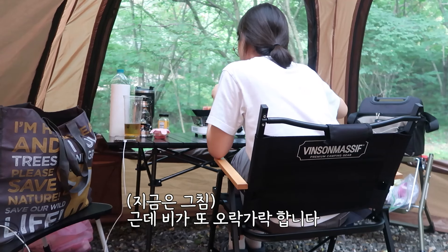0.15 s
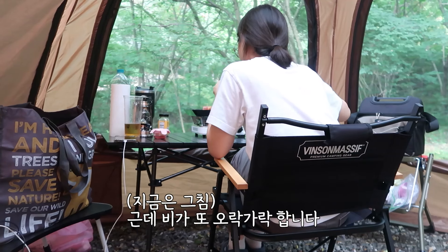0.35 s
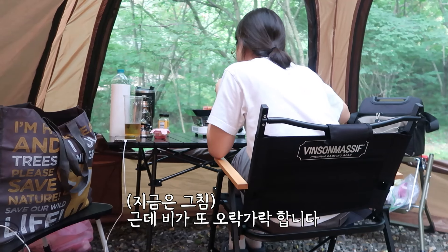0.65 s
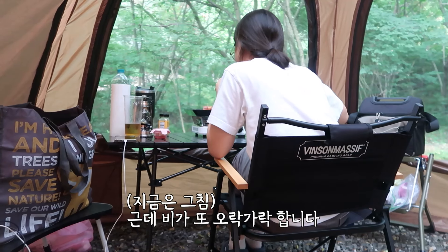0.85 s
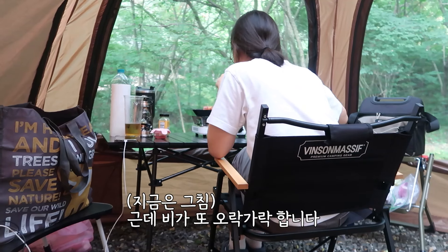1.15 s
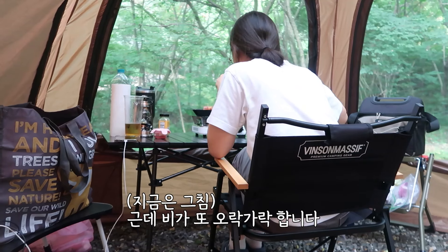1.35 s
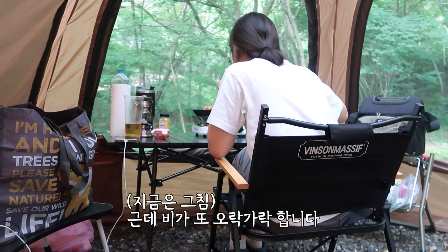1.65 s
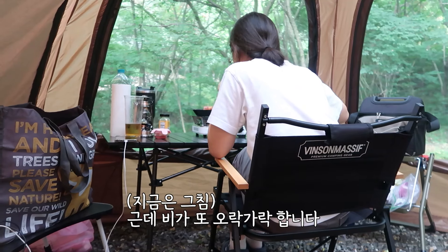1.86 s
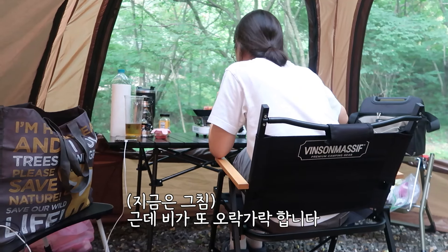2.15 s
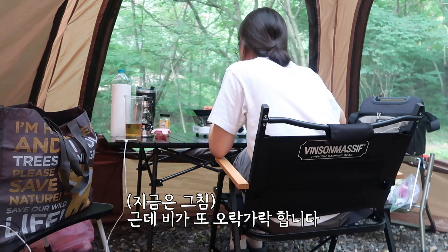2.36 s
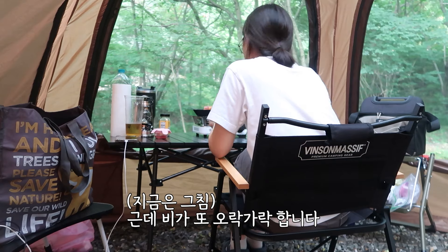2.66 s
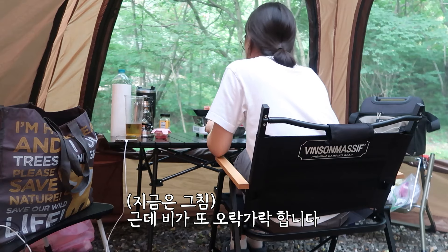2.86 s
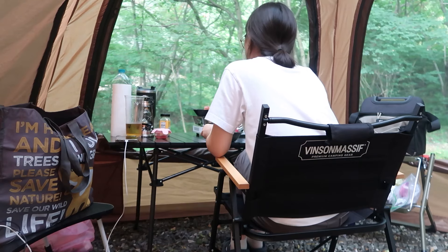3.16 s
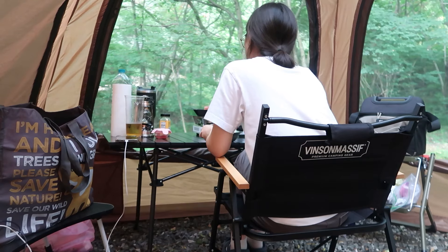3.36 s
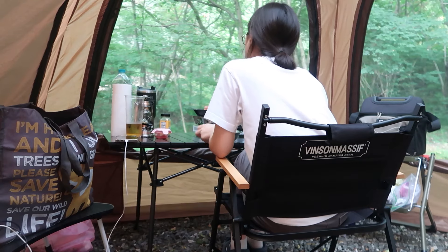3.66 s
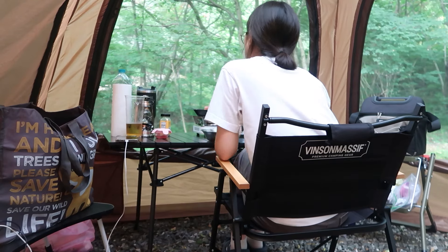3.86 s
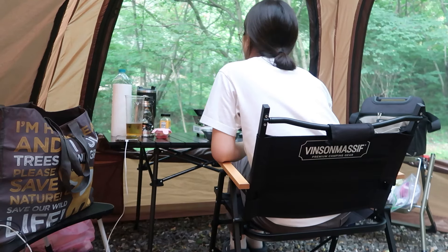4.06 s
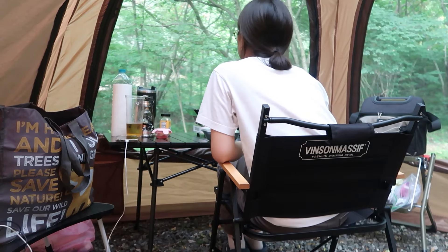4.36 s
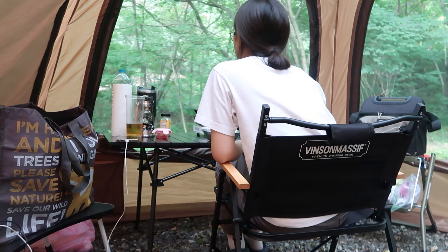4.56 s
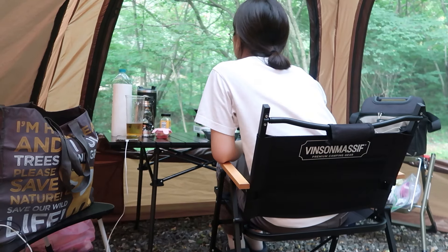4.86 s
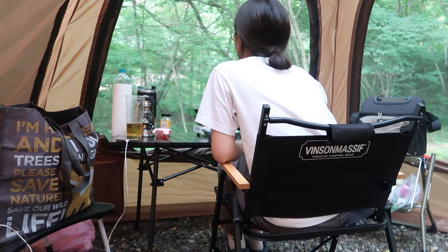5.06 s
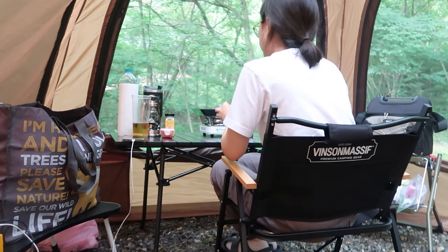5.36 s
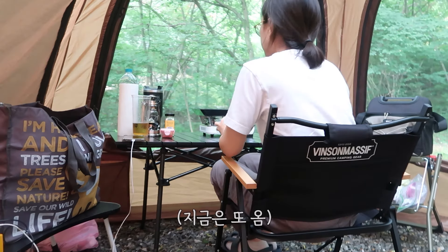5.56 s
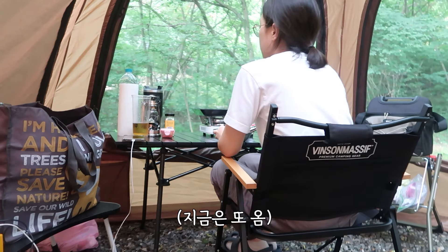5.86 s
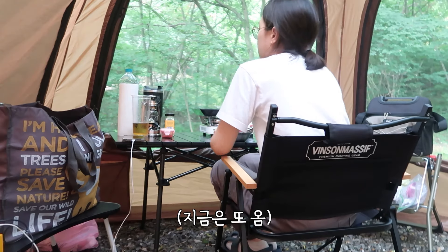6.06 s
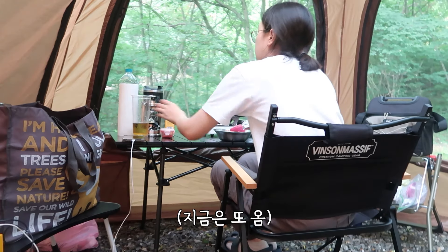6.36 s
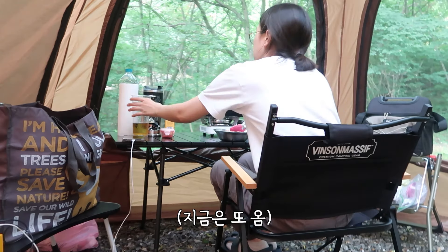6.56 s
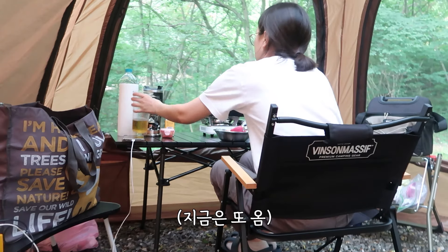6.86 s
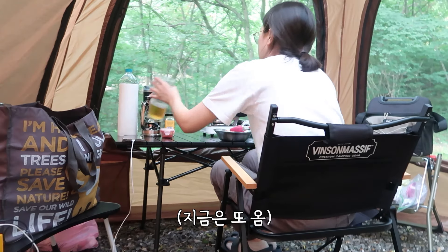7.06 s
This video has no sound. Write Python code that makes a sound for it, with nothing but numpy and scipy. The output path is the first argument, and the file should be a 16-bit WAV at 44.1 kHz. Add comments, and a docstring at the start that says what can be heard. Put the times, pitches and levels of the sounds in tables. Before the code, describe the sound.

Inside a tent in a forest, close stereo pickup. A faint airy wash with sparse drips and thin birdsong; a utensil lightly scrapes and ticks a pan, later a sharp pan strike and two table knocks. Just past five seconds it cuts hard to louder rain pattering on taut fabric with fat drops, a cup clack, a stronger dish clack, and a slurred bird whistle.

```python
"""Rain on the taut fabric of a tent, heard from inside: filtered noise forms its wash, damped pops its drops.
A hard cut at 5.18 s joins a dry lull scene, with faint wash and drips, to this rain scene of patter and drops.
A pan is scraped and struck, a table knocked, a cup and a dish clack: contact noise excites decaying modes.
Birds, gliding frequency-modulated tones with reflections, call in both scenes; one chip is a damped pop.
Under it all lie a low drone of narrow-band noise and a thin whine, a single phase-modulated tone."""
import sys
import numpy as np
from scipy import signal
from scipy.fft import rfft, irfft, next_fast_len
from scipy.io import wavfile
from scipy.ndimage import uniform_filter1d

SR = 44100
rng = np.random.default_rng(int(sys.argv[2]) if len(sys.argv) > 2 else 0)


def log_audio(samples):
    """Write samples as a 16-bit WAV file to the path given in sys.argv[1]."""
    # one column per channel
    frames = np.atleast_2d(samples).T
    # limit to full scale, then quantise
    limited = np.clip(frames, -1, 1)
    pcm = np.round(limited * 32767).astype(np.int16)
    wavfile.write(sys.argv[1], SR, pcm)


N = 318402
TIME = np.arange(N) / SR  # [s]

# Levels are relative: later mixing, reflections and band limiting alter them.
# Spectra of the two washes: (frequency [Hz], level per hertz [dB])
LULL_SPECTRUM = [(12, -43), (20, -2), (54, -11.5), (97, -1), (118, -7.5), (178, -3.5), (205, -3.5),
                 (235, -5.5), (733, -11.5), (1170, -10.5), (1590, -9.5), (3760, -14.5), (12400, -42.5),
                 (13400, -64), (15000, -82)]
RAIN_SPECTRUM = [(15, -42), (25, -15), (53, -6.5), (163, 4.5), (250, -1.5), (501, 2.5), (811, -1.5),
                 (879, 0), (1540, 2), (2300, 4), (6720, -15.5), (10300, -29.5), (12400, -46), (13500, -42),
                 (15000, -62)]
# Stereo width of the washes and of the near sounds: (frequency [Hz], gain of the side signal [dB])
LULL_WIDTH = [(60, -31), (110, -12.5), (200, -7), (380, -0.5), (700, -3.5), (1290, -7.5), (2380, -8.5),
              (4400, -5), (8120, 4.5), (15000, 11)]
RAIN_WIDTH = [(60, -18), (110, -12), (200, -4), (380, -3), (700, -7.5), (1290, -9), (2380, -11.5),
              (4400, -4), (8120, 3), (15000, 28)]
NEAR_WIDTH = [(200, -28), (1000, -32), (2200, -16), (4000, -5.5), (7000, 2), (10000, 7.5), (14000, 12)]
# Single drops on the fabric, fat and small: (time [s], level [dB], pitch of the pop [Hz], splash level [dB])
DROPS = [(5.184, -27, 1500, -18), (5.2183, -21, 890, -9.5), (5.4496, -9.5, 1030, -11),
         (5.471, -18, 990, -15), (5.7126, -17.5, 930, -20), (5.7458, -18, 1350, -8),
         (6.0676, -19.5, 1110, -10.5), (6.341, -17, 1130, -13), (6.4305, -17, 860, -7.5),
         (6.541, -21.5, 1300, -17), (6.6253, -28.5, 1100, -2.5), (6.792, -22, 1365, -10),
         (6.859, -23.5, 800, -13), (6.9799, -13.5, 970, -12), (7.033, -28.5, 1080, -6),
         (7.0998, -18, 1200, -22), (7.1919, -15, 1120, -10.5)]
# Drips and small ticks; the first is the sharp edge of a utensil tick on the pan, the third a short high chip
# of a bird: (time [s], level [dB], pitch [Hz], splash level [dB], ringing [cycles])
SMALL_POPS = [(.5785, -33.5, 3230, -4.5, 0.45), (1.908, -43, 2890, -18, 2.2),
              (2.19, -37.5, 4330, -15, 0.98), (3.468, -40, 1880, -24, 2.6), (3.747, -48, 1220, -5, 5.6),
              (4.256, -44, 1210, -3, 2.1), (4.332, -39.5, 2700, -9, 1), (4.375, -37, 2500, -11.5, 0.88),
              (4.757, -37, 3800, -9, 0.68)]
# Spectrum of a splash: (frequency [Hz], level per hertz [dB])
SPLASH = [(300, -22), (1500, 9), (3000, 6), (5500, -7.5), (9000, -13), (15000, -31)]
# Decay in the tent and among the trees: (frequency [Hz], t60 [s])
TENT_DECAY = [(200, 0.097), (1000, 0.069), (4000, 0.12), (12000, 0.013)]
FOREST_DECAY = [(1000, 0.26), (2200, 0.88), (6000, 0.66)]
# Components of the drone: (frequency [Hz], level [dB], nominal bandwidth [Hz])
DRONE = [(58.8, -60, 4.6), (92, -61.5, 5.6)]
# Gain of the drone over time: (time [s], level [dB])
DRONE_SWELL = [(0, -3), (1.3, 1.5), (2.3, 2.5), (2.8, -4), (4.7, -2), (5.3, 1.5), (7.2, 3)]
# Strokes of a utensil over the pan: (time [s], length [s], level [dB])
SCRAPES = [(0.152, 0.31, -46), (0.293, 0.063, -56), (0.509, 0.091, -50)]
# Spectrum of the scraping grit: (frequency [Hz], level per hertz [dB])
GRIT = [(400, -16), (1100, 9), (2000, 12), (3300, -4), (4700, 3), (7500, -7), (9700, -18), (12000, -40),
        (15000, -49)]
# Modes of the pan under the pressing utensil: (frequency [Hz], level [dB], t60 [s])
SCRAPED_PAN_MODES = [(1077, 0, 0.053), (1730, -8, 0.037), (1856, 0, 0.073), (2240, 1, .04),
                     (2750, -11, 0.05), (4000, -8, 0.045), (4800, -8, .05), (5170, -13, .05),
                     (7010, -15, .04), (10100, -15, 0.033)]
# Knocks: (time [s], level [dB], chattering contact [s], spectral tilt about 2 kHz [dB per octave])
PAN_KNOCKS = [(.577, -50, 0.0025, 1), (2.474, -25.5, 0.0075, 0)]
TABLE_KNOCKS = [(3.229, -24, 0.0064, -0.08), (3.326, -32.5, 0.021, -1.3), (3.464, -53, 0.0068, 0)]
CUP_KNOCKS = [(5.409, -43, 0.0051, 3.8), (5.7715, -22.5, 0.0076, 0.8)]
DISH_KNOCKS = [(5.9265, -16.5, 0.0062, 0.67)]
# Modes of each struck object, before the knock's tilt: (frequency [Hz], level [dB], t60 [s])
PAN_MODES = [(518, -10.5, 0.33), (1110, -14, 0.11), (1335, -17, 0.23), (1626, -9, 0.3), (1866, -6.5, 0.23),
             (2358, -4.5, 0.17), (4600, -16, 0.22), (4970, -9, 0.088), (6800, -9, 0.07), (7150, -13, 0.07),
             (7200, -12, 0.11), (7655, -19, 0.06), (8600, -27, 0.17), (9060, -13, 0.036), (9348, -15, 0.11)]
TABLE_MODES = [(197, -17.5, 0.11), (443, -12.5, 0.092), (548, -9.5, 0.037), (1253, -14, 0.2),
               (1574, -3, 0.066), (2003, -4, 0.11), (3350, -6.5, 0.059), (6000, -26, 0.17)]
CUP_MODES = [(1320, -4, 0.11), (1810, -1.5, 0.09), (1880, 2, 0.061), (2330, 1, .06), (4520, -10.5, .09),
             (4640, -16, .08), (5152, -7.5, 0.095), (6950, -12, 0.075), (8000, -14.5, 0.12),
             (8200, -18, .08), (10050, -23, .06)]
DISH_MODES = [(1280, -2.5, 0.14), (1630, -3.5, 0.13), (1707, 11, 0.04), (1840, -19, 0.27),
              (2300, -6, 0.051), (2720, -15, 0.066), (3500, -17, 0.07), (5010, -14, 0.053),
              (5270, -18, 0.07), (6850, -24, .05), (7700, -27, 0.06), (9270, -35, 0.058)]
# Contact spectra, before the knock's tilt: (frequency [Hz], level per hertz [dB])
PAN_CLACK = [(120, -66), (200, -45), (443, -27), (789, -14), (1170, -2), (2420, -1), (3870, -13.5),
             (5450, -8), (6300, -26), (7420, -10), (10300, -24.5), (12500, -27), (15000, -83)]
TABLE_CLACK = [(71, -46), (120, -31), (780, -10), (1990, -3), (3400, -8.5), (5280, -19), (6190, -20.5),
               (9400, -33.5), (10200, -47), (11900, -35), (14000, -92)]
CUP_CLACK = [(150, -29), (900, -13), (1800, 4.5), (2300, -6), (2900, -6), (4000, -19), (5000, -6),
             (5900, -21), (7000, -15.5), (10300, -19.5), (14300, -37), (15500, -48)]
DISH_CLACK = [(88, -60), (150, -19.5), (1040, -10.5), (1700, -4), (2020, -6.5), (2310, -11), (3280, -13),
              (4310, -19.5), (5030, -11), (6110, -24), (8170, -23), (14300, -35), (15500, -59)]
# Decay of the dense weak modes left after a knock: (frequency [Hz], t60 [s])
CLATTER_DECAY = [(400, 0.17), (2000, 0.16), (5000, 0.14), (12000, 0.15)]
DISH_CLATTER_DECAY = [(400, 0.25), (2000, 0.15), (5000, 0.18), (12000, 0.13)]
# In the bird tables, buzz is the rms pitch deviation as a share of the pitch.
# Single peeps and rasps: (time [s], length [s], start pitch [Hz], end pitch [Hz], level [dB], buzz [share])
PEEPS = [(0.185, 0.14, 2850, 2916, -49.5, 0.064), (0.309, 0.029, 2385, 2050, -45, 0.028),
         (0.555, 0.089, 2003, 1753, -56, 0.058), (1.566, 0.097, 2554, 2803, -48.5, 0.048),
         (2.262, 0.051, 1920, 2014, -55, .01), (4.374, 0.06, 3406, 3317, -60, .007),
         (5.977, 0.048, 5330, 5320, -49, .003), (6.809, 0.042, 4450, 4700, -48.5, 0.04),
         (6.914, 0.06, 4730, 4100, -54, 0.038)]
# Upward slides of a very distant bird: (time [s], level [dB])
UPSLIDES = [(3.464, -65), (3.785, -63.5), (4.475, -65.5)]
# Repeats of the thin song's motif: (time [s], level [dB], pitch [ratio])
MOTIFS = [(.24, -44, 1.012), (.567, -44.5, .988)]
# Syllables, before the motif's level and ratio: (delay [s], length [s], start pitch [Hz],
# target pitch [Hz], settling time [s], level [dB], buzz [share])
SYLLABLES = [(0, 0.088, 5300, 6000, 0.033, -9.5, .03), (0.153, .062, 5620, 4350, .055, -6.5, .018),
             (0.19, 0.036, 3800, 4050, .04, -4.5, .012), (0.21, 0.044, 3980, 4420, 0.0146, 1, 0.014)]
# Short arched whistles of the near bird: (time [s], length [s], top pitch [Hz], sag of the ends [share],
# level [dB], swell [dB], buzz [share])
ARCHES = [(0.722, 0.14, 2115, 0.114, -48, 5, 0.022), (5.484, 0.104, 2225, 0.044, -40.5, 9, 0.02),
          (5.721, 0.065, 2295, 0.034, -42, 10, 0.034), (5.786, 0.075, 2310, 0.08, -33.5, 3, 0.016)]
# Calls of the piping bird: (time [s], high pitch [Hz], high-note level [dB], low-note level [dB])
PIPE_CALLS = [(1.503, 3440, -58.5, -54.5), (2.024, 3510, -53, -49.5), (2.553, 3550, -53, -45),
              (6.931, 3460, -49, -45)]
# Its short low notes between calls: (time [s], level [dB])
PIPS = [(1.794, -48), (2.355, -47.5), (6.745, -49.5)]
# Long whistle of the near bird: (time [s], pitch [Hz], level [dB])
SLUR = [(6.124, 2150, -29), (6.148, 2835, -40), (6.187, 2750, -38), (6.219, 2810, -37), (6.303, 2850, -39),
        (6.322, 2680, -33), (6.342, 2160, -33), (6.376, 1870, -35), (6.43, 1857, -41)]

CUT_S = 5.18  # time of the cut to the rain scene
LULL_DB, RAIN_DB = -50, -41.5  # gains of the washes
WHINE_HZ, WHINE_DB = 13010, -70.5
NOTE_ATTACK_S, NOTE_RELEASE_S = .013, .018
UPSLIDE_S, UPSLIDE_FROM_HZ, UPSLIDE_TO_HZ, UPSLIDE_SETTLE_S = 0.144, 2500, 3970, 0.036
BUZZ_AT_S, BUZZ_S, BUZZ_FROM_HZ, BUZZ_TO_HZ, BUZZ_DB = .88, .39, 4220, 5800, -56
BUZZ_UPPER_RATIO, BUZZ_UPPER_DB = 1.2, -8  # weaker second voice, relative to the first
PIPE_HIGH_S, PIPE_GAP_S = 0.086, .066  # length of the high note; delay from its start to the low note
PIPE_LOW_S, PIPE_FROM_HZ, PIPE_LOW_HZ, PIPE_SETTLE_S = 0.11, 2580, 2352, 0.0148
PIP_S, PIP_FROM_HZ, PIP_HZ = 0.09, 2450, 2330
PIPE_BUZZ, PIPE_RELEASE_S = .013, .045
ECHO_S = .17  # delay of the answer from the far trees
EDGE_HZ = 15750  # upper band edge


def amp(db):
    """Logarithmic level: decibels to amplitude gain."""
    return 10 ** (np.asarray(db) / 20)


def evened(x):
    """Normalization: scales a signal to rms 1."""
    return x / np.sqrt(np.mean(x ** 2) + 1e-20)


def read(points, hz):
    """Interpolation: reads a table on a log-frequency axis."""
    f, value = np.transpose(points)
    return np.interp(np.log(hz + 1), np.log(f + 1), value)


def add(mix, s, sound):
    """Superposition: adds a sound into the mix at time s."""
    part = mix[..., max(round(s * SR), 0):][..., :sound.shape[-1]]
    part += sound[..., :part.shape[-1]]


def colour(x, spectrum, tilt_db=0):
    """Spectral filtering: applies dB gains, tilted per octave about 2 kHz."""
    size = next_fast_len(x.shape[-1])
    hz = np.fft.rfftfreq(size, 1 / SR)
    octaves = np.log2((hz + 1) / 2000)
    gain = amp(read(spectrum, hz) + tilt_db * octaves)
    return irfft(rfft(x, size) * gain, size)[..., :x.shape[-1]]


def fade(x, decay):
    """Frequency-dependent damping: each band dies away at its own rate."""
    hz, t, z = signal.stft(x, SR, nperseg=256)
    damping = amp(-60 * t / read(decay, hz)[:, None])
    return signal.istft(z * damping, SR, nperseg=256)[1][:, :x.shape[1]]


def wander(rate_hz, size):
    """Low-pass random process: smooth noise, about rms 1, with a Gaussian roll-off at the given rate."""
    length = next_fast_len(size + SR)
    hz = np.fft.rfftfreq(length, 1 / SR)
    spectrum = rfft(rng.standard_normal(length)) * np.exp(-(hz / rate_hz) ** 2)
    return evened(irfft(spectrum, length))[:size]


def stereo(pair, width):
    """Mid-side decoding: turns a mid and a filtered side signal into left and right."""
    side = colour(pair[1], width)
    return np.array([pair[0] + side, pair[0] - side])


def echoes(x, decay, gap_s):
    """Diffuse reflection: sparse mid and side taps of random sign follow after a short gap."""
    signs = rng.choice([-1., 1.], (2, SR))
    taps = signs * (rng.random((2, SR)) < .1) * (TIME[:SR] > gap_s)
    tail = fade(taps, decay)
    return signal.oaconvolve(x[None], tail / np.linalg.norm(tail[0]), axes=1)[:, :N]


def wash(spectrum, patchy_db, flicker_db):
    """Incoherent summation: mid and side noise for countless far drops, in drifting patches and quick flickers."""
    frames, hz = N // 256 + 5, np.fft.rfftfreq(1024, 1 / SR)
    shape = (frames, len(hz))
    # patches are smoothed over time and frequency, flickers over frequency alone
    patches = uniform_filter1d(rng.standard_normal(shape), size=8, axis=0)
    patches = evened(uniform_filter1d(patches, size=14, axis=1))
    flicker = evened(uniform_filter1d(rng.standard_normal(shape), size=90, axis=1))
    z = rng.standard_normal((2, *shape)) + 1j * rng.standard_normal((2, *shape))
    z *= amp(patchy_db * patches + flicker_db * flicker)
    noise = signal.istft(z.transpose(0, 2, 1), nperseg=1024, noverlap=768)[1][:, :N]
    return evened(colour(noise, spectrum))


def steady_tones():
    """Narrow-band noise gives a wavering drone alike in both ears; phase offset sets a thin whine apart."""
    drone = np.zeros(N)
    for hz, db, width in DRONE:
        envelope = signal.hilbert(wander(width, size=N))
        carrier = np.exp(2j * np.pi * (hz - width / 2) * TIME)
        drone += amp(db) * evened((envelope * carrier).real)
    # channel phases differ by 2.4 radians
    phase = 2 * np.pi * WHINE_HZ * TIME + np.array([[0], [2.4]]) + .3 * wander(8, size=N)
    whine = amp(WHINE_DB) * np.sin(phase)
    return drone * amp(np.interp(TIME, *np.transpose(DRONE_SWELL))) + whine


def pop(hz, splash_db, cycles=0.3, splash_s=0.0021, burst_s=0.0001, tick_db=-7, tick_s=0.00006):
    """Impulsive excitation: a sharp tick, a damped oscillation and a short hiss, as when a drop hits and bursts."""
    t = TIME[:2048]
    u = t * hz / cycles
    tick = np.exp(-(t / tick_s - np.e) ** 2)
    push = u * np.exp(1 - u) * np.sin(2 * np.pi * hz * t)
    hiss = evened(colour(rng.standard_normal(len(t)), SPLASH))
    splash = hiss * np.exp(-t / splash_s) * (1 - np.exp(-t / burst_s))
    return amp(tick_db) * tick - push + amp(splash_db) * splash


def patter(per_s, low_hz, high_hz, spread_db, splash_db, cycles, count=20):
    """Random arrivals: many weak drops and a few strong ones; each spot has its own pitch."""
    out = np.zeros(N)
    for hz in np.geomspace(low_hz, high_hz, count):
        at = np.flatnonzero(rng.random(N) < per_s / count / SR)
        train = np.zeros(N)
        train[at] = amp(spread_db * np.minimum(rng.exponential(1, N)[at], 3))
        out += signal.oaconvolve(train, pop(hz, splash_db, cycles))[:N]
    return evened(out)


def under_tent(x, wet_db, aside=0.47):
    """Early reflection: a sound, spread by a quadrature side signal, returns off the fabric walls."""
    direct = np.array([x, aside * signal.hilbert(x).imag])
    return stereo(direct + amp(wet_db) * echoes(x, TENT_DECAY, gap_s=0.0019), NEAR_WIDTH)


def scrapes(slips_per_s=2500, grit_db=-4, ring_db=-2.5, catch_db=2.0, catch_hz=45, drift=.02, drift_hz=9):
    """Friction: tiny slips rasp the pan, the utensil catches, and the resonances drift as it moves."""
    pressure, t = np.zeros(N), TIME[:SR // 8]
    for s, length, db in SCRAPES:
        add(pressure, s, amp(db) * np.sin(np.linspace(0, np.pi, round(length * SR))))
    pressure *= amp(catch_db * np.tanh(wander(catch_hz, size=N)))
    slips = rng.standard_normal((2, N)) * (rng.random((2, N)) < slips_per_s / SR)
    body = sum(amp(db - 60 * t / t60) * np.sin(2 * np.pi * hz * t) for hz, db, t60 in SCRAPED_PAN_MODES)
    # reading the ring at an uneven speed shifts its pitches
    place = np.cumsum(1 + drift * wander(drift_hz, size=N)) / SR
    ring = evened(np.array([np.interp(place, TIME, signal.oaconvolve(row, body)[:N]) for row in slips]))
    grit = evened(colour(slips, GRIT))
    return stereo(pressure * (amp(grit_db) * grit + amp(ring_db) * ring), NEAR_WIDTH)


def slide(length, from_hz, to_hz, settle_s):
    """Exponential relaxation: the pitch of a note starts off its target and settles towards it."""
    return to_hz + (from_hz - to_hz) * np.exp(-TIME[:round(length * SR)] / settle_s)


def note(glide, db, buzz, swell_db=0, flutter_db=0, flutter_hz=110, buzz_hz=350, release_s=NOTE_RELEASE_S):
    """Frequency and amplitude modulation: one gliding, buzzing whistle along a pitch curve."""
    t = TIME[:len(glide)]
    hz = glide * (1 + buzz * wander(buzz_hz, size=SR // 2)[:len(t)])
    gate = np.minimum(t / NOTE_ATTACK_S, 1) * np.minimum(t[::-1] / release_s, 1)
    flutter = flutter_db * np.tanh(wander(flutter_hz, size=SR // 2)[:len(t)])
    swell = gate * amp(swell_db * t / t[-1] + flutter)
    return amp(db) * evened(swell * np.sin(2 * np.pi * np.cumsum(hz) / SR))


def among_trees(song, direct_db, blur_db, wet_db, echo_db):
    """Successive reflection: tent walls blur each note at once; near trees answer later, far ones last."""
    heard = amp(wet_db) * echoes(song, FOREST_DECAY, gap_s=0.027)
    heard += amp(blur_db) * echoes(song, TENT_DECAY, gap_s=0.00076)
    add(heard, ECHO_S, amp(echo_db) * heard)
    heard[0] += amp(direct_db) * song
    return stereo(heard, NEAR_WIDTH)


def distant_birds():
    """Pitch glides: faint whistles slide up and level off; single peeps and rasps change pitch linearly."""
    out = np.zeros(N)
    for s, db in UPSLIDES:
        rise = slide(UPSLIDE_S, UPSLIDE_FROM_HZ, UPSLIDE_TO_HZ, UPSLIDE_SETTLE_S)
        add(out, s, note(rise, db, buzz=0.0039))
    for s, length, from_hz, to_hz, db, buzz in PEEPS:
        add(out, s, note(np.linspace(from_hz, to_hz, round(length * SR)), db, buzz))
    return out


def thin_song():
    """Modulated syllables: a high motif, repeated, then one long rising buzz of two parallel voices."""
    out = np.zeros(N)
    for s, db, ratio in MOTIFS:
        for delay, length, from_hz, to_hz, settle_s, syllable_db, buzz in SYLLABLES:
            glide = ratio * slide(length, from_hz, to_hz, settle_s)
            add(out, s + delay, note(glide, db + syllable_db, buzz, swell_db=-1, flutter_db=3.5))
    rise = np.linspace(BUZZ_FROM_HZ, BUZZ_TO_HZ, round(BUZZ_S * SR))
    add(out, BUZZ_AT_S, note(rise, BUZZ_DB, buzz=0.0354, swell_db=-4.5))
    add(out, BUZZ_AT_S, note(rise * BUZZ_UPPER_RATIO, BUZZ_DB + BUZZ_UPPER_DB, buzz=0.073))
    return out


def knocks(table, modes, clack, decay, ring_db, clack_db, tail_db, rise_s, stop_s=0.007):
    """Modal excitation: hard things meet, chatter for some milliseconds, then ring out in their modes."""
    out, t = np.zeros((2, N)), TIME[:SR // 2]
    for s, db, contact_s, tilt_db in table:
        noise = evened(colour(rng.standard_normal((2, len(t))), clack, tilt_db))
        chatter = amp(clack_db) * noise * np.exp(-np.maximum(t - contact_s, 0) / stop_s)
        clatter = amp(tail_db) * fade(noise, decay)
        ring = np.zeros((2, len(t)))
        for hz, mode_db, t60 in modes:
            damping_db = 60 * np.maximum(t - contact_s / 2, 0) / t60
            envelope = amp(mode_db + tilt_db * np.log2(hz / 2000) - damping_db)
            ring += envelope * np.sin(2 * np.pi * (hz * t + rng.random((2, 1))))
        ring *= np.minimum(t / contact_s, 1)  # the modes build up while the contact lasts
        strike = (chatter + clatter) * np.minimum(t / rise_s, 1)
        add(out, s, amp(db) * (strike + amp(ring_db) * ring))
    return stereo(out, NEAR_WIDTH)


def single_pops(table):
    """Discrete impulses: single pops at their own moments; a row may give the cycles that its pop rings."""
    out = np.zeros(N)
    for s, db, *shape in table:
        add(out, s, amp(db) * pop(*shape))
    return out


def arched_whistles():
    """Parabolic pitch curves: mellow, slightly rough whistles in short arches."""
    out = np.zeros(N)
    for s, length, top_hz, sag, db, swell_db, buzz in ARCHES:
        arch = top_hz * (1 - sag * np.linspace(-1, 1, round(length * SR)) ** 2)
        add(out, s, note(arch, db, buzz, swell_db, flutter_db=9.5, flutter_hz=160))
    return out


def piping_bird():
    """Steady and settling tones: clear high-low calls with short low notes between them, all softly released."""
    out = np.zeros(N)
    for s, high_hz, high_db, low_db in PIPE_CALLS:
        high = np.full(round(PIPE_HIGH_S * SR), high_hz)
        low = slide(PIPE_LOW_S, PIPE_FROM_HZ, PIPE_LOW_HZ, PIPE_SETTLE_S)
        add(out, s, note(high, high_db, PIPE_BUZZ, release_s=PIPE_RELEASE_S))
        add(out, s + PIPE_GAP_S, note(low, low_db, PIPE_BUZZ, swell_db=4, release_s=PIPE_RELEASE_S))
    for s, db in PIPS:
        pip = slide(PIP_S, PIP_FROM_HZ, PIP_HZ, PIPE_SETTLE_S)
        add(out, s, note(pip, db, PIPE_BUZZ, release_s=PIPE_RELEASE_S))
    return out


def long_whistle():
    """Continuous phase: one unbroken, quavering slur scoops up, holds and falls away."""
    out = np.zeros(N)
    s, hz, db = np.transpose(SLUR)
    t = np.arange(s[0], s[-1], 1 / SR)
    add(out, s[0], note(np.interp(t, s, hz), np.interp(t, s, db), buzz=0.012, flutter_db=5))
    return out


def scene():
    """Superposition: a hard cut joins the lull scene to the rain scene; kitchenware and birds sound in both."""
    after_cut = np.clip((TIME - CUT_S) / 0.0023, 0, 1)
    lull = amp(LULL_DB) * stereo(wash(LULL_SPECTRUM, patchy_db=2.0, flicker_db=0.5), LULL_WIDTH)
    light = patter(per_s=70, low_hz=1180, high_hz=4900, spread_db=1.5, splash_db=2.0, cycles=0.29)
    lull += amp(-61.5) * under_tent(light, wet_db=-9.5)
    rain = amp(RAIN_DB) * stereo(wash(RAIN_SPECTRUM, patchy_db=1.0, flicker_db=1.0), RAIN_WIDTH)
    dull = patter(per_s=300, low_hz=650, high_hz=3250, spread_db=4.5, splash_db=-14.0, cycles=0.2)
    rain += amp(-48.5) * under_tent(dull, wet_db=-1.5)
    ringing = patter(per_s=400, low_hz=980, high_hz=3760, spread_db=5.0, splash_db=-14.5, cycles=0.43)
    rain += amp(-48.5) * under_tent(ringing, wet_db=-8)
    weather = (1 - after_cut) * lull + after_cut * rain
    fabric_drops = under_tent(single_pops(DROPS), wet_db=-7.0)
    utensil_tick = single_pops(SMALL_POPS[:1])
    bird_chip = single_pops(SMALL_POPS[2:3])
    drips = single_pops(SMALL_POPS[1:2]) + single_pops(SMALL_POPS[3:])
    small_pops = under_tent(utensil_tick + bird_chip + drips, wet_db=4)
    pan = scrapes() + knocks(PAN_KNOCKS, PAN_MODES, PAN_CLACK, CLATTER_DECAY,
                             ring_db=2.0, clack_db=-1.5, tail_db=-4.5, rise_s=0.0014)
    table = knocks(TABLE_KNOCKS, TABLE_MODES, TABLE_CLACK, CLATTER_DECAY,
                   ring_db=1.5, clack_db=-7.0, tail_db=-3.5, rise_s=0.0046)
    cup = knocks(CUP_KNOCKS, CUP_MODES, CUP_CLACK, DISH_CLATTER_DECAY,
                 ring_db=0, clack_db=-6.5, tail_db=-1.0, rise_s=0.0054)
    dish = knocks(DISH_KNOCKS, DISH_MODES, DISH_CLACK, DISH_CLATTER_DECAY,
                  ring_db=1.5, clack_db=-7.0, tail_db=-3.5, rise_s=0.0081, stop_s=0.0063)
    song = among_trees(piping_bird() + distant_birds(), direct_db=-4, blur_db=-4, wet_db=-5.0, echo_db=-11)
    song += among_trees(thin_song(), direct_db=-4, blur_db=-4, wet_db=-3.5, echo_db=-19)
    song += among_trees(arched_whistles(), direct_db=2.7, blur_db=-2.5, wet_db=-5.0, echo_db=-26)
    song += among_trees(long_whistle(), direct_db=-0.5, blur_db=-12, wet_db=-4.5, echo_db=-9.5)
    return weather + fabric_drops + small_pops + pan + table + cup + dish + song + steady_tones()


def record(dry):
    """Band limitation: a linear-phase low-pass filter removes the treble above the band edge."""
    low_pass = signal.firwin(255, EDGE_HZ, window=("kaiser", 9), fs=SR)
    return signal.oaconvolve(dry, low_pass[None], "same")


dry = scene()
out = record(dry)
log_audio(out)
```